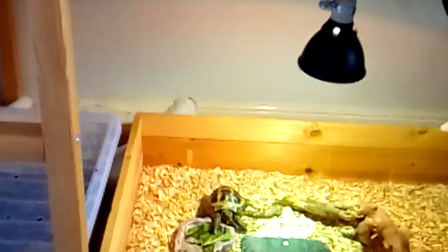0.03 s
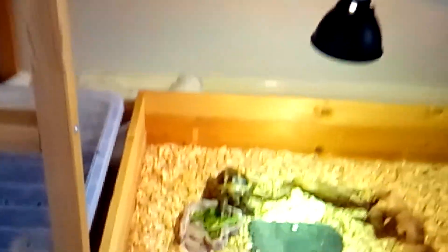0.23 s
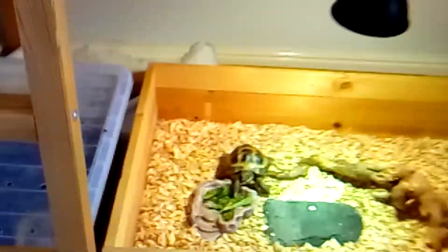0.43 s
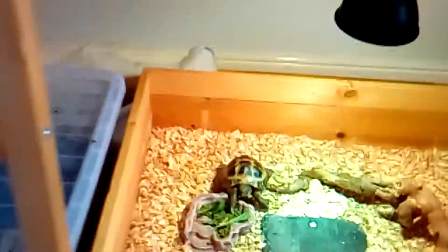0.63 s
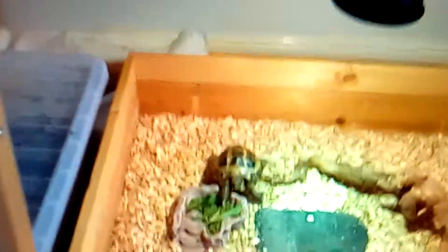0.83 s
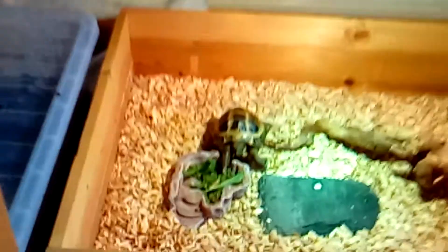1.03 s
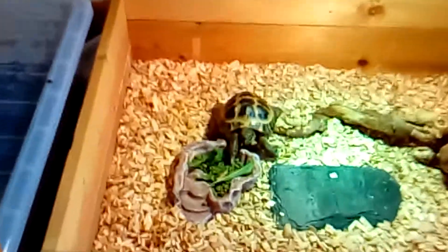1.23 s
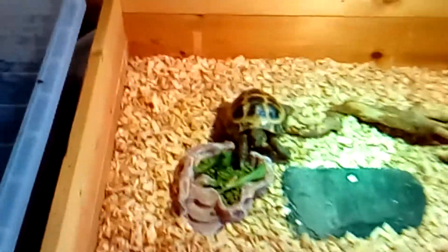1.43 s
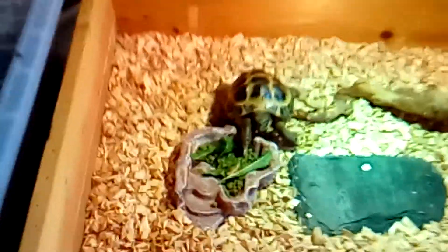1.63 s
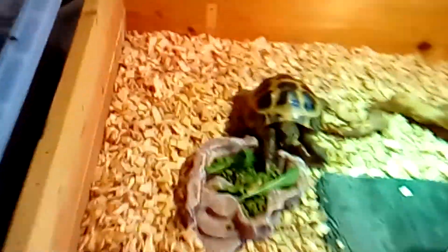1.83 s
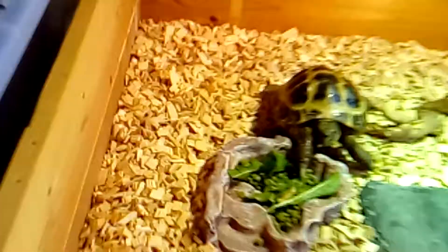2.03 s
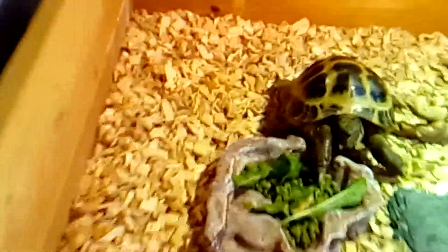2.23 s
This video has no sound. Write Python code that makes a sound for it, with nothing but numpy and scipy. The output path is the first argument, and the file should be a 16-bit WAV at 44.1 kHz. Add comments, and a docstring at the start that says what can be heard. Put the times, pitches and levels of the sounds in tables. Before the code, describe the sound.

A close, crackling rustle with sharp crunches and cracks as something brushes by near a wooden tortoise pen. A dull knock, a snap and a small bright rattle follow, then faint scuffs over hiss on a handheld phone.

```python
"""A close, crackling rustle with sharp catches and cracks: something brushes and clatters as a phone
is carried up to a wooden tortoise pen. Friction grains, crunches and brittle cracks ring the rubbed body.
A dull knock, a snap and a small bright bouncing rattle end it; then only faint scuffs over hiss.
The microphone port rings near 5 kHz and colours most of the sound."""
import sys
import numpy as np
from scipy import signal
from scipy.fft import rfft, irfft
from scipy.io import wavfile

SR = 44100
rng = np.random.default_rng(int(sys.argv[2]) if len(sys.argv) > 2 else 0)


def master_out(mix):
    """Clip the mix to full scale and print it as 16-bit PCM to the path in sys.argv[1]."""
    frames = np.transpose(np.atleast_2d(mix))
    ceiling = np.clip(frames, -1, 1)
    pcm = np.round(ceiling * 32767).astype(np.int16)
    wavfile.write(sys.argv[1], SR, pcm)


N = 101429

# Rustle envelopes (bright crackle, woody middle, hollow low end): time_s, level_db
CRACKLE_ENVELOPE = [(0, -53), (.03, -60.5), (.045, -53.5), (.12, -60), (.14, -46), (.168, -47.5),
                    (.19, -42.5), (.218, -48.5), (.24, -38.5), (.272, -38), (.294, -30.5), (.315, -40),
                    (.365, -48), (.392, -43.5), (.452, -58), (.47, -48.5), (.515, -63), (.55, -50),
                    (.62, -51), (.65, -61.5), (.72, -56), (.80, -102)]
WOOD_ENVELOPE = [(0, -65), (.095, -61), (.128, -54), (.138, -46), (.185, -46.5), (.215, -54), (.24, -42.5),
                 (.293, -40), (.325, -47), (.41, -50.5), (.46, -58), (.62, -63.5), (.82, -69)]
HOLLOW_ENVELOPE = [(0, -75), (.12, -78), (.3, -52), (.35, -62), (.5, -64.5), (.595, -61), (.65, -71),
                   (.8, -89)]
# Spectra of the same three layers: freq_hz, relative_db
CRACKLE_SPECTRUM = [(100, -68), (1500, -23.5), (3200, -19), (4300, -11.5), (5000, -5), (6000, -6.5),
                    (6900, -12), (8200, -10.5), (10600, -13.5), (12000, -21.5), (15500, -33)]
WOOD_SPECTRUM = [(100, -51.5), (750, -8), (1000, -4.5), (1600, 3), (2250, -1.5), (2650, 5.5), (3300, 0),
                 (4500, 0.5), (8000, -14), (15000, -81)]
HOLLOW_SPECTRUM = [(30, -36), (90, -9), (150, -3), (230, -7), (350, 0), (580, 6), (900, -1), (1500, -15),
                   (5000, -51)]
# Reflections off near boards: delay_s, gain_db
BOARD_ECHOES = [(.0027, -20), (.0077, -12)]
# Modes of the rubbed body: freq_hz, lift_db
BODY_MODES = [(1010, 7.5), (1560, 2.5), (3785, 8), (5000, 5.5), (5750, 1)]
# Brittle cracks: start_s, energy_db, pitch_hz
CRACKS = [(0.035, -20.5, 5100), (0.1778, -18.5, 5400), (0.2242, -17, 8100), (0.2289, -19, 5030),
          (0.2606, -21, 5360), (0.287, -11.5, 8040), (0.376, -21.5, 5500), (0.4572, -19, 5040),
          (0.5337, -23, 7000), (0.5536, -26, 5370)]
# Catches in the rubbing: start_s, energy_db, decay_s, wood_relative_db
CATCHES = [(0.1038, -28, 0.0033, 1.5), (.127, -31, 0.0007, -2), (0.1348, -13.5, 0.0019, -0.5),
           (.147, -26, 0.00056, -3), (0.18, -16, 0.0013, 4), (0.2253, -7, 0.00089, -7.5),
           (.335, -15.5, 0.00094, -18), (0.3443, -14, 0.0023, -17), (0.381, -12, 0.0021, -15),
           (0.4029, -10, 0.0011, -10), (0.427, -24, 0.0006, -6.5), (0.434, -19.5, 0.00061, -13),
           (0.4605, -15, 0.0031, -16), (0.5297, -16, 0.0053, -28)]
# Soft rubs, Gaussian in time and band: peak_s, level_db, sigma_s, centre_hz, sigma_octaves
SCUFFS = [(.229, -56, .004, 13000, .2), (.289, -43, .011, 7600, .3), (.603, -54, .016, 8500, .35),
          (.6, -71, .018, 140, .4), (1.085, -70, .033, 830, .35), (1.085, -70, .045, 8100, .1),
          (1.446, -62, .006, 5600, .25), (1.485, -67, .022, 5150, .11), (1.475, -70, .035, 400, 1.3),
          (1.559, -62.7, .009, 6700, .45), (1.815, -67, .024, 1000, 1), (1.85, -70.5, .03, 560, .3),
          (2.22, -68.5, .055, 5150, .1)]
# Rattle bounces: start_s, energy_db
BOUNCES = [(.7342, -17), (.7375, -16), (.7392, -19), (.7417, -20), (.7428, -19), (.7476, -18), (.7495, -21)]
# Spectra of the hiss and the impacts: freq_hz, relative_db
HISS_SPECTRUM = [(20, -14.5), (50, 0.5), (130, 1.5), (250, -0.5), (550, -0.5), (1100, -6.5), (1900, -6.5),
                 (2400, -10.5), (4200, -11.5), (7300, -7.5), (8000, 0), (9000, -4.5), (10800, -1.5),
                 (11500, -6.5), (15500, -9)]
CRACK_SPECTRUM = [(200, -45), (1600, -5), (8500, 0), (15500, -30)]
KNOCK_SPECTRUM = [(230, -29), (330, -13), (550, -4), (800, 0.5), (1000, 3.5), (1200, -18), (1600, -18),
                  (2400, -33), (8000, -56)]
SNAP_SPECTRUM = [(100, -22.5), (700, -20.5), (4200, -31.5), (4900, -0.5), (5300, 1.5), (6100, -27),
                 (7500, -4), (8100, -24), (8700, -10.5), (10700, -15.5), (15000, -33)]
RATTLE_SPECTRUM = [(1600, -40), (2000, -6.5), (2400, -32), (3700, -12), (4300, -22), (4600, -1.5),
                   (5100, 2), (5900, 8), (6400, -15), (6900, -15), (7800, -16), (9200, -5), (11000, -15.5),
                   (15000, -45)]

PORT_HZ, PORT_WIDTH_HZ, PORT_LIFT_DB = 4980, 545, 9
CONTACT_RISE_S = 0.00035


def undb(db):
    """Decibels to gain."""
    return 10 ** (np.asarray(db) / 20)


def unit(x):
    """Scale to unit energy."""
    return x / np.linalg.norm(x)


def add(out, start_s, x):
    """Mix x into out at start_s."""
    i = max(int(start_s * SR), 0)
    out[i:i + len(x)] += x[:N - i]


def envelope(points):
    """Gain over time; silent after the last point."""
    return undb(np.interp(np.arange(N) / SR, *np.array(points).T, right=-np.inf))


def colour(x, spectrum, size=4096):
    """Minimum-phase filter, unit power gain: spectrum times microphone port resonance."""
    hz = np.maximum(np.arange(size // 2 + 1) * SR / size, 1)
    points_hz, points_db = np.array(spectrum).T
    gain = undb(np.interp(np.log(hz), np.log(points_hz), points_db))
    detuning = (hz / PORT_HZ - PORT_HZ / hz) * PORT_HZ / PORT_WIDTH_HZ
    port = 1 + (undb(PORT_LIFT_DB) - 1) / (1 + 1j * detuning)
    cepstrum = irfft(np.log(gain * np.abs(port)))
    cepstrum[1:size // 2] *= 2
    cepstrum[size // 2 + 1:] = 0
    response = irfft(np.exp(rfft(cepstrum)))
    return signal.fftconvolve(x, unit(response))[:len(x)]


def grains(clicks_per_s=1000, spread_db=4.5, chips=2400, chip_decay_s=0.0023, smooth_share=0.33):
    """Friction at rms 1: uneven clicks, briefly ringing chips, smooth noise."""
    clicks = (rng.random(N) < clicks_per_s / SR) * rng.choice([-1, 1], N)
    clicks = clicks * undb(spread_db * np.minimum(rng.exponential(size=N), 2))
    onset, nyquist_share, strength = rng.random((chips, 3)).T[:, :, None]
    k, rings = np.arange(512), np.zeros(N)
    pings = strength * np.sin(np.pi * nyquist_share * k) * np.exp(-k / SR / chip_decay_s)
    np.add.at(rings, (onset * (N - len(k))).astype(int) + k, pings)
    rough = clicks / clicks.std() + rings / rings.std()
    return np.sqrt((1 - smooth_share) / 2) * rough + np.sqrt(smooth_share) * rng.standard_normal(N)


def rustle():
    """Rubbing grains in three bands: crackle, wood, hollow."""
    crackle = envelope(CRACKLE_ENVELOPE) * colour(grains(), CRACKLE_SPECTRUM)
    wood = envelope(WOOD_ENVELOPE) * colour(grains(), WOOD_SPECTRUM)
    hollow = envelope(HOLLOW_ENVELOPE) * colour(grains(), HOLLOW_SPECTRUM)
    return crackle + wood + hollow


def boards(x):
    """Near boards reflect the sound a few ms late; power preserved."""
    out = x.copy()
    for delay_s, gain_db in BOARD_ECHOES:
        add(out, delay_s, undb(gain_db) * x)
    return out / np.sqrt(1 + sum(undb(gain_db) ** 2 for _, gain_db in BOARD_ECHOES))


def body(x, t60_s=0.098):
    """The rubbed body rings on in narrow modes."""
    radius = np.exp(-np.log(1000) / (t60_s * SR))
    out = x.copy()
    for freq_hz, lift_db in BODY_MODES:
        pole = radius * np.exp(2j * np.pi * freq_hz / SR)
        mode = 2 * (1 - radius) * signal.lfilter([1], [1, -pole], x).real
        out += (undb(lift_db) - 1) * mode
    return out


def background(hiss_db=-65, rise_db_per_s=0.8, whine_hz=12897, whine_db=-86):
    """Slowly growing room and microphone hiss; faint electrical whine."""
    t = np.arange(N) / SR
    hiss = colour(rng.standard_normal(N), HISS_SPECTRUM)
    whine = np.sqrt(2) * np.sin(2 * np.pi * whine_hz * t)
    return undb(hiss_db + rise_db_per_s * t) * hiss + undb(whine_db) * whine


def contact(decay_s, size=1024):
    """Burst of tiny fractures: fast rise, exponential decay, unit energy."""
    t = np.arange(size) / SR
    fade = np.exp(-t / decay_s) * (1 - np.exp(-t / CONTACT_RISE_S))
    fade /= fade.max()
    burst = rng.standard_normal(size) * fade
    for _ in range(2):
        whitened = irfft(np.exp(1j * np.angle(rfft(burst))))
        burst = whitened * np.minimum(2 * fade, 1)
    return unit(burst)


def cracks(burst_decay_s=0.00067, ring_decay_s=0.0021, size=1024):
    """Brittle pieces break: a bright burst plus a ring at each piece's pitch."""
    out, t = np.zeros(N), np.arange(size) / SR
    for start_s, energy_db, pitch_hz in CRACKS:
        ring = np.cos(2 * np.pi * pitch_hz * t) * np.exp(-t / ring_decay_s)
        burst = colour(contact(burst_decay_s, size), CRACK_SPECTRUM)
        add(out, start_s, undb(energy_db) * unit(unit(burst) + unit(ring)))
    return out


def crunch(decay_s, modes=14, ring_db=-4, ring_decay_s=0.0027, size=1024):
    """A contact plus the randomly detuned ring of the caught piece."""
    t = np.arange(size) / SR
    modes_hz = np.geomspace(900, 10000, modes)[:, None] * 2 ** rng.uniform(-0.13, 0.09, (modes, 1))
    ring = np.sin(2 * np.pi * (modes_hz * t + rng.random((modes, 1)))).sum(0)
    fade = np.exp(-t / ring_decay_s) * (1 - np.exp(-t / CONTACT_RISE_S))
    return contact(decay_s, size) + undb(ring_db) * unit(ring * fade)


def catches(cutoff_hz=10030):
    """The rubbing catches and lets go in short, low-passed crunches."""
    out = np.zeros(N)
    for start_s, energy_db, decay_s, wood_relative_db in CATCHES:
        bright = unit(colour(crunch(decay_s), CRACKLE_SPECTRUM))
        woody = unit(colour(crunch(decay_s), WOOD_SPECTRUM))
        add(out, start_s, undb(energy_db) * (bright + undb(wood_relative_db) * woody))
    return signal.sosfilt(signal.butter(4, cutoff_hz, fs=SR, output="sos"), out)


def room(x, wet_db, t60_s=0.17, delay_s=0.0025):
    """Direct sound plus the short tail of a small furnished room."""
    t = np.arange(SR // 2) / SR
    tail = rng.standard_normal(len(t)) * np.exp(-np.log(1000) * t / t60_s) * (t > delay_s)
    return x + undb(wet_db) * signal.fftconvolve(x, unit(tail))[:N]


def scuffs():
    """Soft rubs, each swelling and fading in its own noise band."""
    out, t = np.zeros(N), np.arange(N) / SR
    hz = np.maximum(np.fft.rfftfreq(N, 1 / SR), 1)
    for peak_s, level_db, sigma_s, centre_hz, sigma_octaves in SCUFFS:
        band = np.exp(-.5 * (np.log2(hz / centre_hz) / sigma_octaves) ** 2)
        noise = irfft(rfft(rng.standard_normal(N)) * band, N)
        swell = np.exp(-.5 * ((t - peak_s) / sigma_s) ** 2)
        out += undb(level_db) * swell * noise / noise.std()
    return out


def knock(start_s=0.5315, energy_db=-16.5, decay_s=0.0027):
    """One dull, hollow blow."""
    out = np.zeros(N)
    add(out, start_s, undb(energy_db) * unit(colour(contact(decay_s), KNOCK_SPECTRUM)))
    return out


def tap(start_s, energy_db, spectrum, pitch_ratio=1):
    """A hard contact: one impulse into a body's resonances."""
    impulse = np.zeros(N)
    add(impulse, start_s, undb([energy_db]))
    return colour(impulse, [(hz * pitch_ratio, db) for hz, db in spectrum])


def snap():
    """One sharp tap right at the microphone."""
    return tap(start_s=0.5811, energy_db=-5.5, spectrum=SNAP_SPECTRUM)


def rattle(detune=0.03, ring_db=-32.5, t60_s=0.16, rise_s=0.012):
    """A small hard object bounces fast, pitch varying per hit, and leaves a bright fading ring."""
    bounces = sum(tap(start_s, energy_db, RATTLE_SPECTRUM, 1 + detune * rng.uniform(-0.92, 1))
                  for start_s, energy_db in BOUNCES)
    age_s = np.maximum(np.arange(N) / SR - BOUNCES[0][0], 0)
    fade = np.exp(-np.log(1000) * age_s / t60_s) * (1 - np.exp(-age_s / rise_s))
    return bounces + undb(ring_db) * fade * colour(rng.standard_normal(N), RATTLE_SPECTRUM)


def scene():
    """Mono mix; only the catches and the knock feed the room tail."""
    rubbing = body(boards(rustle()) + room(catches(), wet_db=-4) + cracks())
    impacts = room(knock(), wet_db=-7.5) + snap() + rattle()
    return (rubbing + impacts + scuffs() + background())[None]


def record(dry, cutoff_hz=15500):
    """The phone's steep low-pass."""
    return signal.sosfilt(signal.ellip(10, .2, 70, cutoff_hz, fs=SR, output="sos"), dry)


dry = scene()
out = record(dry)
master_out(out)
```